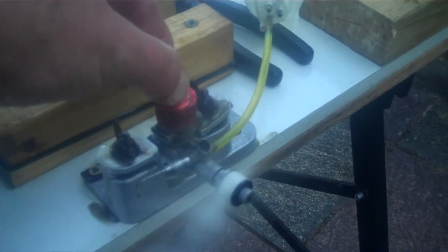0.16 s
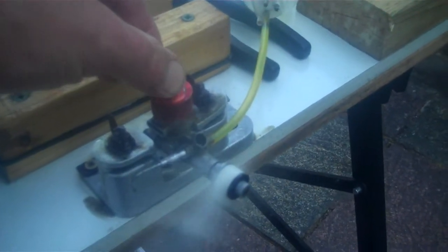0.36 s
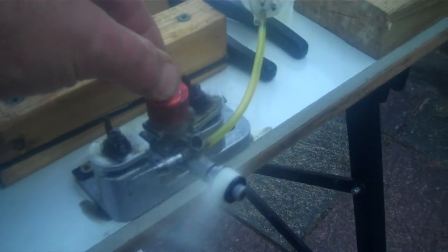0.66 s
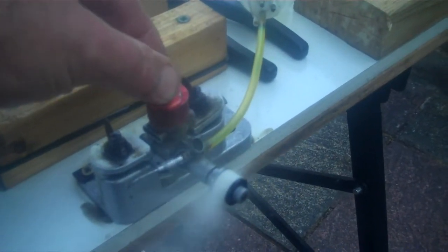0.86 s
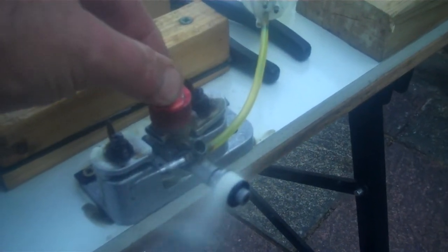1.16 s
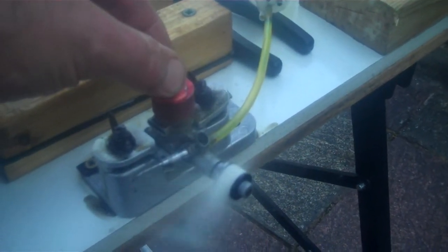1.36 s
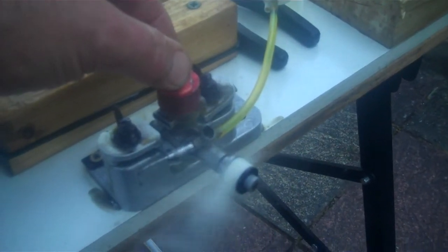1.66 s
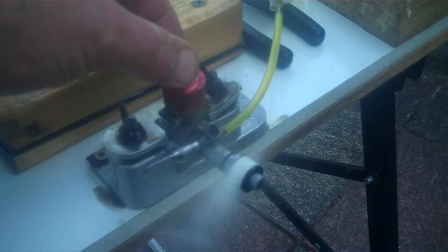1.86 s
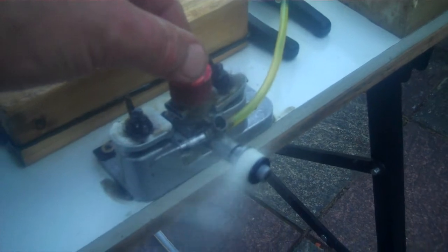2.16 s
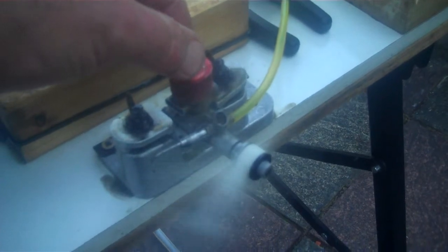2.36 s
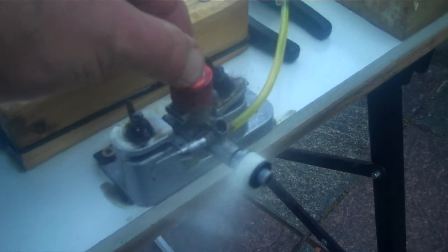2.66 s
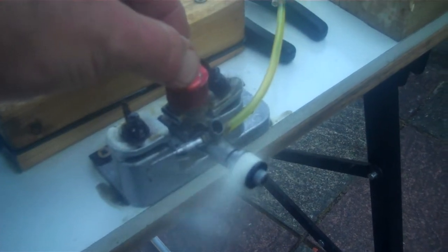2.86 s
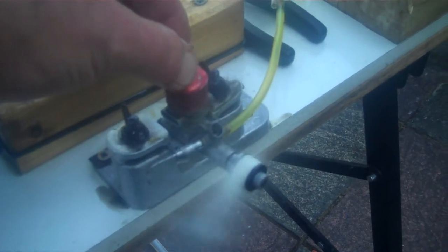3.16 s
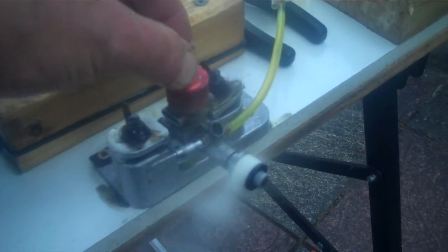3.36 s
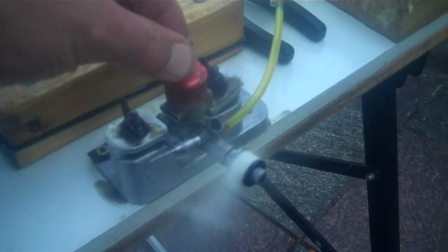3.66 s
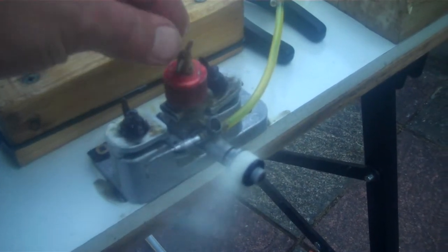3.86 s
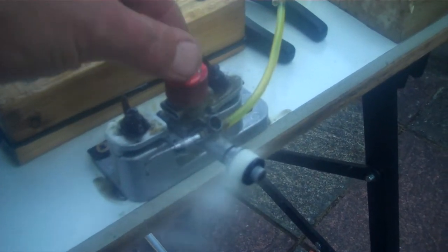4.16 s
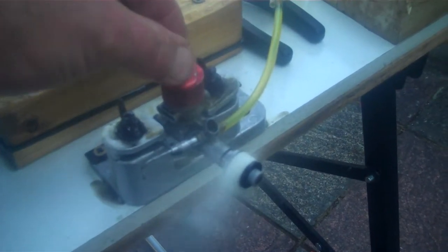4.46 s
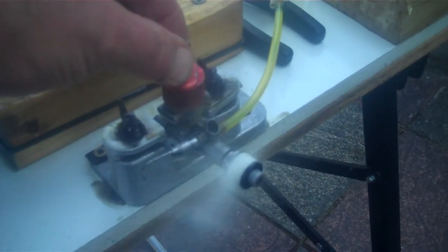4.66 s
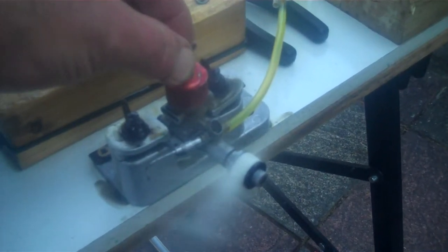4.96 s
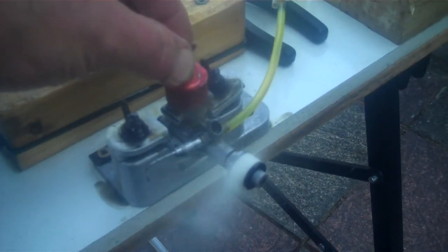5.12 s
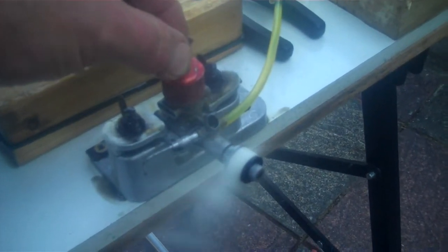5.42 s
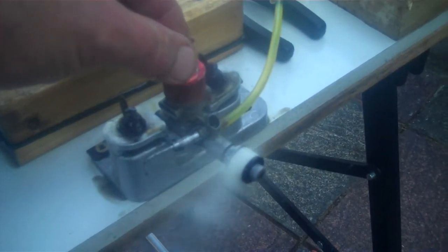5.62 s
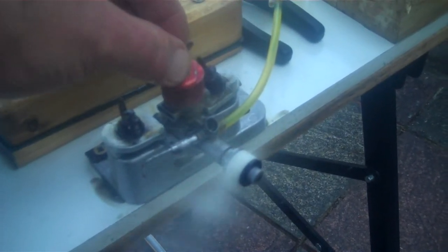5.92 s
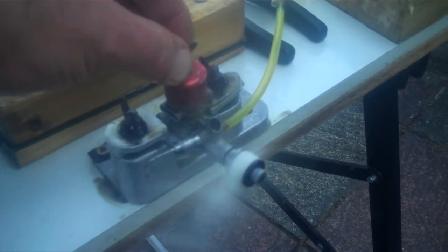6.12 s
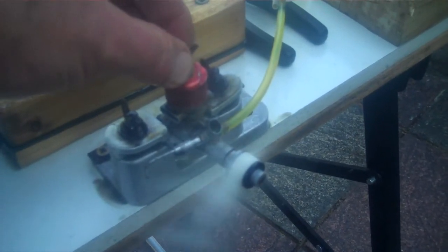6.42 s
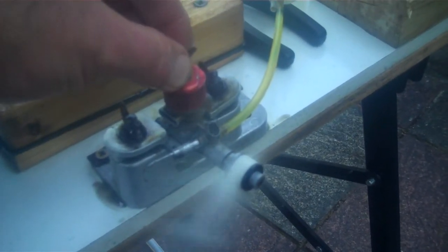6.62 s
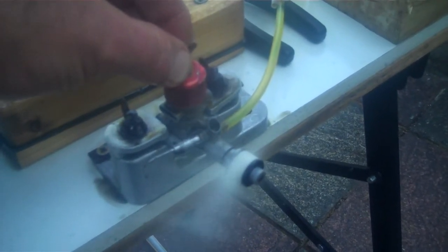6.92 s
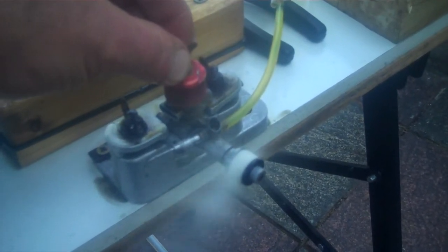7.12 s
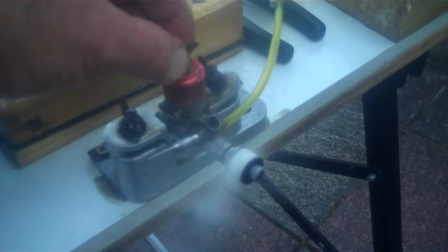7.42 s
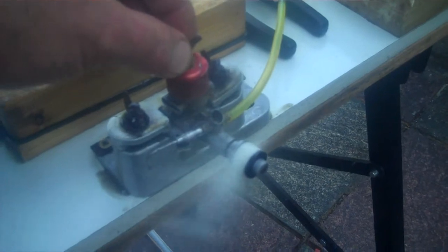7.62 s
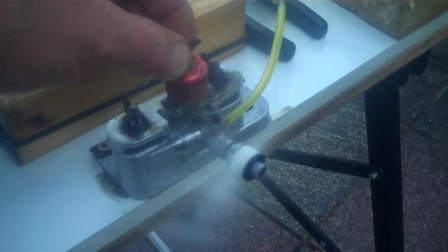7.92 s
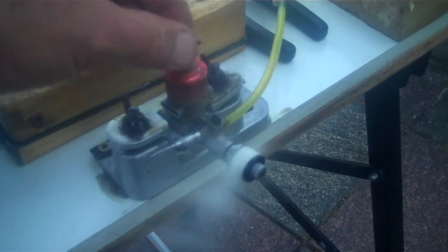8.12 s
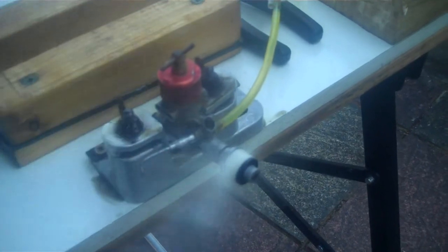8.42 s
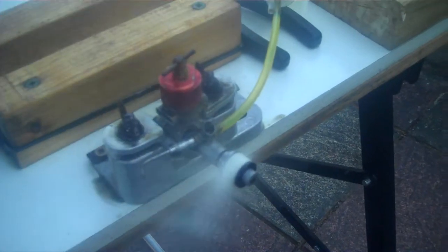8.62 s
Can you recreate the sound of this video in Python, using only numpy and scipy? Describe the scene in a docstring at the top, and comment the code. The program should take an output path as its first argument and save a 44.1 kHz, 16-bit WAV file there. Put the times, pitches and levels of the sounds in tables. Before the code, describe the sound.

Heard from very close outdoors, a little propeller engine buzzes loudly without a break, with a metallic edge and an airy hiss. The note wavers in small dips and rises as the speed is tuned, then holds steadier near the end, with a light mechanical rattle blended in. Air from the propeller rumbles on the microphone throughout and hits it in short irregular gusts, stronger on the right side.

```python
"""The hard, rasping buzz of a small two-stroke model diesel, turning a propeller on an outdoor bench.
Each turn gives one sharp exhaust crack with a spit of gas, then a hiss at the intake. Fingers work the
compression screw, so the speed sags and recovers. The stereo microphone stands close, where the
propeller's wash buffets its two ports; behind the engine the yard gives a short answer."""
import sys
import numpy as np
from scipy import signal
from scipy.fft import rfft, irfft, next_fast_len
from scipy.io import wavfile
from scipy.ndimage import map_coordinates

SR = 44100
rng = np.random.default_rng(int(sys.argv[2]) if len(sys.argv) > 2 else 0)


def store_pcm(level_fs):
    """Save levels as 16-bit WAV."""
    pcm = np.round(np.clip(level_fs, -1, 1) * 32767).astype(np.int16)
    wavfile.write(sys.argv[1], SR, np.atleast_2d(pcm).T)


N = 387198

# turning points of the shaft speed as the screw is worked: (time [s], speed [rev/s])
SHAFT_SPEED = [(0.0, 113.9), (0.12, 116.69), (0.43, 113.83), (0.56, 116.18), (0.93, 111.45), (1.27, 114.89),
               (1.77, 114.76), (2.02, 108.65), (2.39, 117.28), (2.55, 116.92), (2.91, 112.16),
               (3.31, 115.84), (3.61, 116.74), (3.82, 112.13), (4.0, 115.99), (4.33, 115.93), (4.55, 105.1),
               (4.73, 112.92), (4.96, 117.35), (5.35, 109.57), (5.41, 107.19), (5.76, 118.09),
               (6.01, 118.87), (6.36, 112.87), (6.78, 115.89), (7.0, 112.71), (7.51, 115.28),
               (7.67, 113.53), (7.95, 116.73), (8.46, 117.76), (8.78, 116.88)]
# broad resonances struck by each exhaust pulse: (frequency [Hz], width [Hz], gain [dB])
BARK_MODES = [(511, 130, -7.5), (885, 496, 12), (1494, 422, 7), (2248, 990, 11), (2777, 293, 4.1)]
# high ring of the cylinder's metal: (frequency [Hz], width [Hz], gain [dB])
CYLINDER_MODES = [(4754, 195, -4.5), (4954, 404, 1.5), (6254, 1030, 1), (7860, 1400, -20), (8235, 360, 0),
                  (11100, 830, -6), (12600, 1400, -5.5)]
# mount and bench, swelling as a harmonic slides through: (frequency [Hz], width [Hz], gain [dB])
MOUNT_MODES = [(927, 59, 2.5), (1421, 24, 5.5), (2014, 66, 3), (2179, 147, 3), (2552, 130, 2),
               (2945, 150, 1)]
# colours of exhaust gas, intake air, blade hiss and wind on the microphone: (frequency [Hz], gain [dB])
SPIT_COLOUR = [(200, 2), (700, -1), (3000, 1), (3900, -3), (6500, -7), (9000, -5), (11000, 2), (12300, 4.5),
               (14000, 0.5), (15000, -4)]
INTAKE_COLOUR = [(500, -40), (2500, -2), (4500, 1), (5800, -35), (6400, 5), (6900, -58), (7500, 10),
                 (8500, -3), (11000, 7), (14000, -21), (15000, -16)]
BLADE_COLOUR = [(100, 1), (400, -16), (1400, -8.5), (2200, 2.5), (3200, 0.5), (4000, -9), (5000, -6),
                (6000, -10.5), (10000, -19), (12300, -29), (13500, -31), (14200, -17), (15000, -23)]
BUFFET_COLOUR = [(15, 1), (35, -1), (60, 0), (80, -1), (115, -15), (170, -6), (250, -15), (400, -18.5),
                 (800, -38), (3000, -70)]
# ticking from play in the crank train: (time [s], gain [dB])
CRANK_PLAY = [(0, -44), (5.55, 4), (5.8, 0), (6.5, 5.5), (7.9, 3), (8.3, 4), (8.78, 5)]
# near-field throb: (shaft order, left level [dB], right level [dB], left slope [dB per rev/s],
# right slope [dB per rev/s], phase between the ports [rad], phase slope [rad per rev/s])
THROB_ORDERS = [(1, -37, -32, .1, 0.65, 3.5, -0.0031), (2, -33, -35.5, 0.17, 0.77, -3, 0.02),
                (3, -36, -33.5, .75, 0.57, 2.5, -0.088), (4, -61, -32.5, .23, 0.13, 2, -0.016),
                (5, -38.5, -34.5, .067, .32, -2, 0.041)]
# the sheltered left port only now and then swings into the wash: (time [s], left minus right [dB])
LEFT_SHELTER = [(0, 3), (.8, -19), (2.2, -10), (2.5, 6), (2.8, -4), (4.5, -17), (5.5, -20), (6.0, -13),
                (6.3, -7), (8.15, -24), (8.42, -10), (8.78, -21)]
# the hardest buffets on the microphone: (time [s], relative peak [dB], left minus right [dB])
HARD_GUSTS = [(0.27, -32, -5), (0.821, -47, -7), (1.006, -23.5, -17), (1.209, -31, -9), (1.525, -23.5, -17),
              (2.245, -30, -16), (2.618, -28, -6.0), (2.785, -28, -12), (3.097, -23, -4), (4.955, -26, -11),
              (5.632, -27, -10.0), (7.942, -26, -11.0), (8.232, -25, -12.0), (8.35, -33, -12.0)]
# cavity of each microphone port, left then right: (frequency [Hz], width [Hz])
MIC_CAVITIES = [(7184, 1200), (5810, 930)]
# the microphone's stereo balance: (frequency [Hz], left minus right [dB])
MIC_BALANCE = [(500, 0.5), (900, 6.5), (1400, 0.5), (3000, -0.6), (5000, 3.5), (6200, -2.5), (8500, 2),
               (10500, -0.5), (12000, -5)]
# colour of the yard's answer: (frequency [Hz], gain [dB])
YARD_COLOUR = [(500, 0.0), (3000, -2.5), (4000, -0.5), (6000, -1), (12000, 6)]
# the microphone's treble roll-off: (frequency [Hz], gain [dB])
MIC_ROLLOFF = [(14200, -1), (15700, -16)]

BARK_DB, RING_DB, SPIT_DB, YARD_DB = 1.5, 3.5, -23, -7.5
SHARPEN_DB_PER_RPS = 0.13  # a faster exhaust port opens more sharply
BUILD_DB_PER_S = 0.1  # the exhaust builds slowly as the engine runs


def exhaust(turns, bark_db, ring_db, bounce_s=0.00066, bounce_gain=0.37):
    """The exhaust port snaps open once a turn; the crack rings the metal and bounces off the bench."""
    cracks = pulses(turns, jitter_s=5e-6, scatter_db=.4)
    bark = resonate(cracks * amp(bark_db), BARK_MODES + MOUNT_MODES)
    ring = resonate(cracks * amp(ring_db), CYLINDER_MODES)
    return filtered(bark + ring, lambda hz: 1 + bounce_gain * np.exp(-2j * np.pi * hz * bounce_s))


def gas(turns, spit_db):
    """Oily gas spits unevenly behind each crack; nearly half a turn later the intake pops and sucks."""
    sputter_db = 1.24 * wobble(60) + 1.6 * wobble(24)
    exhaust_open = opening(turns, centre=0.036, width=0.14)
    spit = amp(spit_db + sputter_db) * exhaust_open * hiss(SPIT_COLOUR, shared=0.36)
    gulps = pulses(turns - .43, jitter_s=8e-6, scatter_db=1.5)
    pop = resonate(gulps, [(6840, 1200, -1.64)])
    intake_open = opening(turns, centre=0.423, width=0.036)
    intake_open += 0.32 * opening(turns, centre=0.54, width=0.074)
    return spit + pop + amp(-27.5) * intake_open * hiss(INTAKE_COLOUR, shared=0.47)


def crank(turns):
    """Play in the connecting rod gives a light tick on the upstroke."""
    ticks = pulses(turns - .73, jitter_s=8e-6, scatter_db=1.5)
    return resonate(ticks * amp(curve(CRANK_PLAY)), [(6650, 870, -11), (2630, 870, -8.0)])


def throb(turns, excess_rps, let_go_s=8.0, leave_s=0.53, uncover_db=2):
    """At close range, propeller and crankcase push the two ports out of phase, harder with speed."""
    # the hand leaves the screw and uncovers the left port
    clear_db = uncover_db * np.clip((np.arange(N) / SR - let_go_s) / leave_s, 0, 1)
    out = np.zeros((2, N))
    for order, left_db, right_db, left_slope, right_slope, angle, swing in THROB_ORDERS:
        phase = 2 * np.pi * order * (turns - .04)
        left_phase = phase + angle + swing * excess_rps
        out[0] += amp(left_db + left_slope * excess_rps + clear_db) * np.cos(left_phase)
        out[1] += amp(right_db + right_slope * excess_rps) * np.cos(phase)
    return np.sqrt(2) * out


def propeller(wash_db=-33.5, swell_db=1.4, lump_db=3.5):
    """The blades hiss; their wash hits each port in its own lumps, the right one all the time."""
    flow_db = wash_db + swell_db * wobble(6)
    left_db = flow_db + curve(LEFT_SHELTER) + lump_db * wobble(22)
    right_db = flow_db + lump_db * wobble(22)
    wind = np.hypot(amp([left_db, right_db]), gusts())
    buffet = wind * unit_rms(hiss(BUFFET_COLOUR, shared=0))
    return buffet + amp(-29.5) * hiss(BLADE_COLOUR, shared=0.66)


def gusts(rise_s=0.0056, fall_s=0.068, trim_db=-2):
    """Strength of the hard buffets of air at each port: a quick rise and a slower fall."""
    out = np.zeros((2, N))
    for peak_s, peak_db, pan_db in HARD_GUSTS:
        age = np.arange(N) / SR - peak_s
        shape = np.clip(1 + age / rise_s, 0, 1) * np.exp(-np.maximum(age, 0) / fall_s)
        out += amp(peak_db + trim_db) * unit_rms(amp([[pan_db], [0]])) * shape
    return out


def yard(sound, decay_s=.05, gap_s=.0015):
    """Bench clutter and paving scatter a short answer back to the microphone."""
    t = np.arange(SR // 12) / SR
    fade = amp(-60 * t / decay_s) * np.clip(t / gap_s - 1, 0, 1)
    tail = rng.standard_normal((2, len(t))) * fade
    scattered = signal.fftconvolve(sound[None], tail / np.linalg.norm(tail[0]), axes=1)[:, :N]
    return filtered(scattered, lambda hz: amp(along(YARD_COLOUR, hz)))


def amp(db):
    """Decibels to gain."""
    return 10 ** (np.asarray(db) / 20)


def unit_rms(x):
    """Scale to rms 1."""
    return x / np.sqrt(np.mean(x ** 2) + 1e-20)


def along(points, hz):
    """Join (frequency [Hz], value) points on a log axis."""
    knots_hz, values = np.transpose(points)
    return np.interp(np.log(hz + 1), np.log(knots_hz + 1), values)


def curve(points):
    """Join (time [s], value) points with straight lines."""
    times, values = np.transpose(points)
    return np.interp(np.arange(N) / SR, times, values)


def eased(points):
    """Leave and reach each (time [s], value) point smoothly, as a shaft with inertia does."""
    times, values = np.transpose(points)
    index = np.arange(len(times))
    part, whole = np.modf(np.interp(np.arange(N) / SR, times, index))
    return np.interp(whole + np.sin(np.pi / 2 * part) ** 2, index, values)


def wobble(rate):
    """A smooth random curve, rate knots a second."""
    knots = rng.standard_normal(int(N * rate / SR) + 4)
    return map_coordinates(knots, [np.arange(N) * rate / SR])


def filtered(x, response):
    """Pass x through a complex frequency response."""
    size = next_fast_len(N + SR // 4, True)
    return irfft(rfft(x, size) * response(np.fft.rfftfreq(size, 1 / SR)), size)[..., :N]


def resonate(x, modes):
    """Parallel resonances, each applied twice so that it swells before it dies."""
    def band(hz, centre, width):
        return 1j * hz * width / (centre ** 2 - hz ** 2 + 1j * hz * width)
    return filtered(x, lambda hz: sum(amp(db) * band(hz, at, width) ** 2 for at, width, db in modes))


def hiss(colour, shared):
    """Coloured stereo noise; shared is the part of its power common to both sides."""
    common = np.sqrt(shared) * rng.standard_normal(N)
    separate = np.sqrt(1 - shared) * rng.standard_normal((2, N))
    return filtered(common + separate, lambda hz: amp(along(colour, hz)))


def opening(turns, centre, width):
    """A bell-shaped opening once a turn; centre and width in turns."""
    offset = (turns - centre + .5) % 1 - .5
    return np.exp(-.5 * (offset / width) ** 2)


def pulses(turns, jitter_s, scatter_db):
    """One impulse at each whole turn, placed between samples by a windowed sinc."""
    at = np.interp(np.arange(np.ceil(turns[0]), turns[-1]), turns, np.arange(N))
    chance = rng.standard_normal((len(at), 2))
    at += jitter_s * SR * chance[:, 0]
    taps = np.floor(at)[:, None] + np.arange(-7, 9)
    offset = taps - at[:, None]
    shape = np.sinc(offset) * np.cos(np.pi * offset / 16) ** 2
    sized = shape * amp(scatter_db * chance[:, 1:])
    return np.bincount(np.clip(taps, 0, N - 1).astype(int).ravel(), sized.ravel(), N)


def scene(start_turns=.012):
    """The engine close up, timed by its crank angle, with the wash and the yard around it."""
    speed = eased(SHAFT_SPEED)
    excess_rps = speed - np.mean(speed)
    wander = .0008 * wobble(14)  # uneven burning
    turns = start_turns + np.cumsum(speed) / SR + wander
    sharp_db = SHARPEN_DB_PER_RPS * excess_rps
    build_db = BUILD_DB_PER_S * (np.arange(N) - N / 2) / SR
    cracks = exhaust(turns, BARK_DB + build_db, RING_DB + sharp_db + build_db)
    answer = amp(YARD_DB) * yard(cracks)
    engine = cracks + gas(turns, SPIT_DB + sharp_db) + crank(turns) + throb(turns, excess_rps)
    return engine + propeller() + answer


def record(dry, left_lag_s=1.7e-5, top_hz=15750):
    """Each microphone port has its own cavity ring, the left hears later; the top is cut steeply."""
    def microphone(hz):
        cavity = np.array([at ** 2 / (at ** 2 - hz ** 2 + 1j * hz * width) for at, width in MIC_CAVITIES])
        balance = amp(np.outer([.5, -.5], along(MIC_BALANCE, hz)))
        lag = np.exp(np.outer([-1, 1], 1j * np.pi * hz * left_lag_s))
        return cavity * balance * lag * amp(along(MIC_ROLLOFF, hz))
    return filtered(filtered(dry, microphone), lambda hz: hz < top_hz)


dry = scene()
out = record(dry)
store_pcm(out)
```